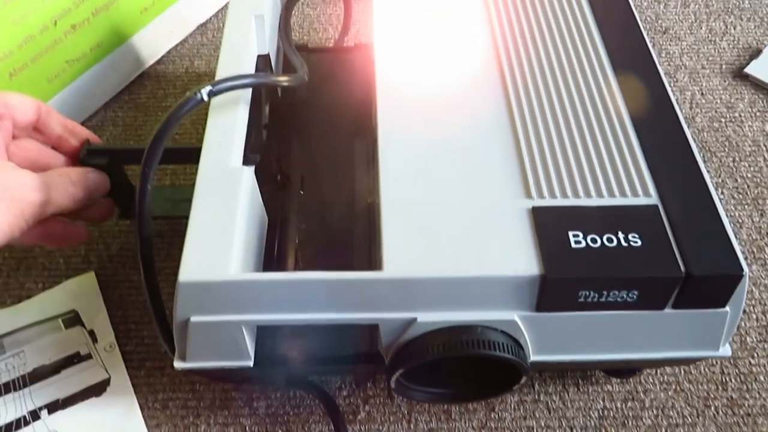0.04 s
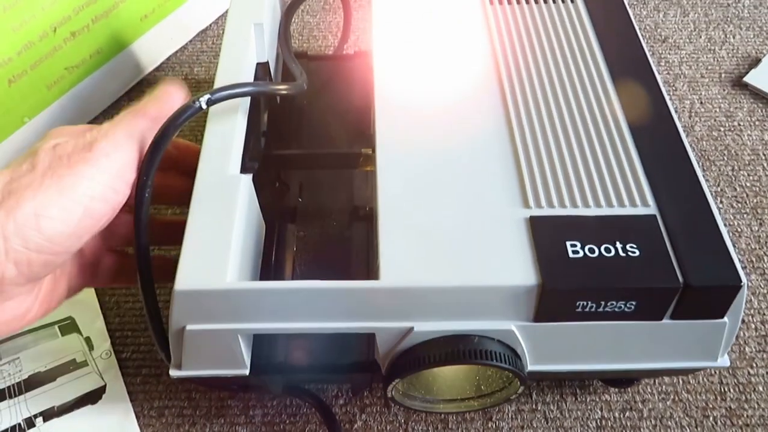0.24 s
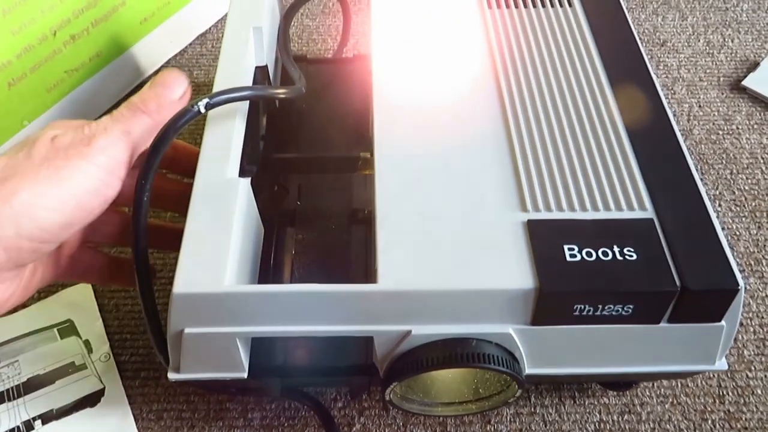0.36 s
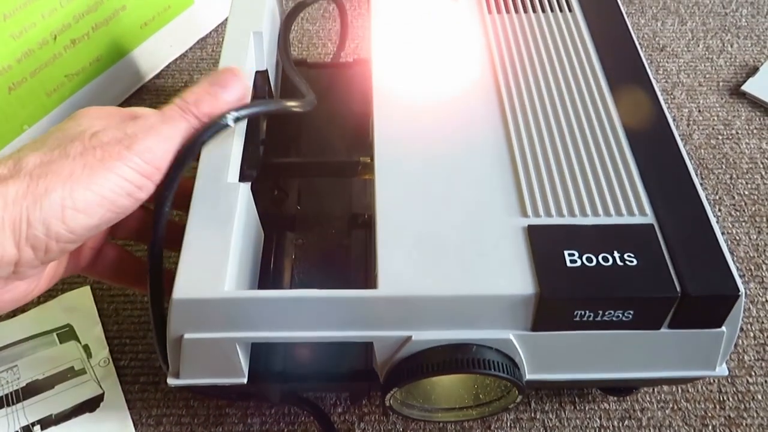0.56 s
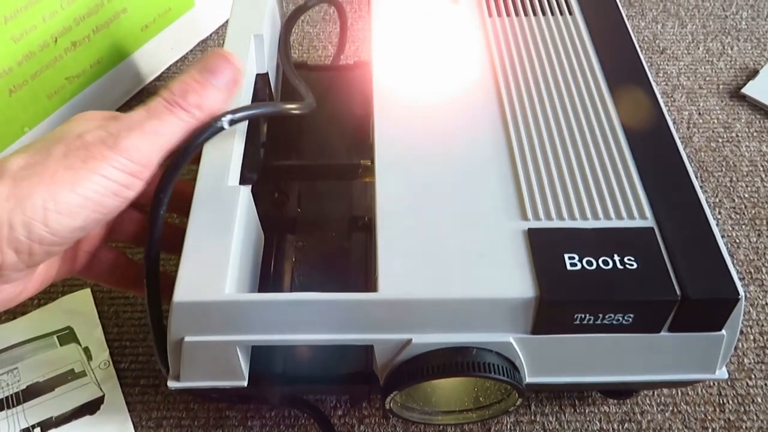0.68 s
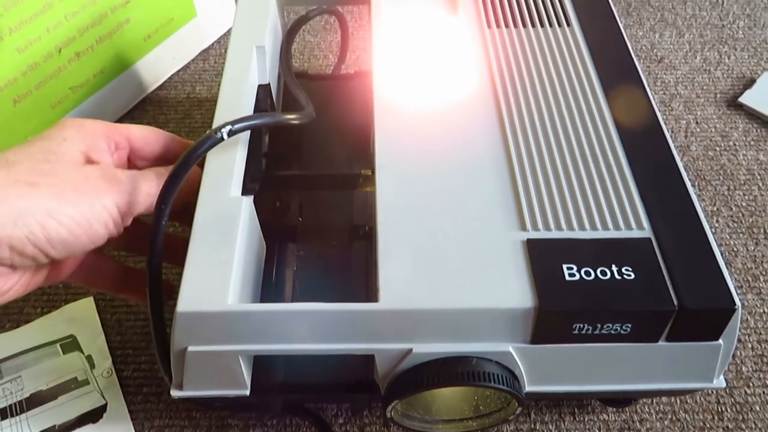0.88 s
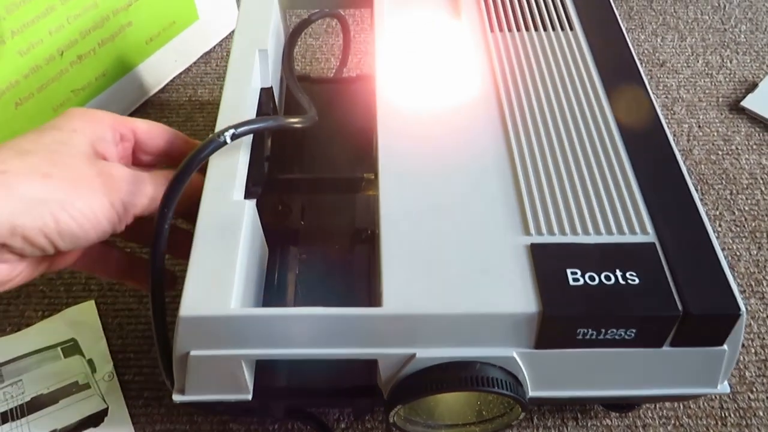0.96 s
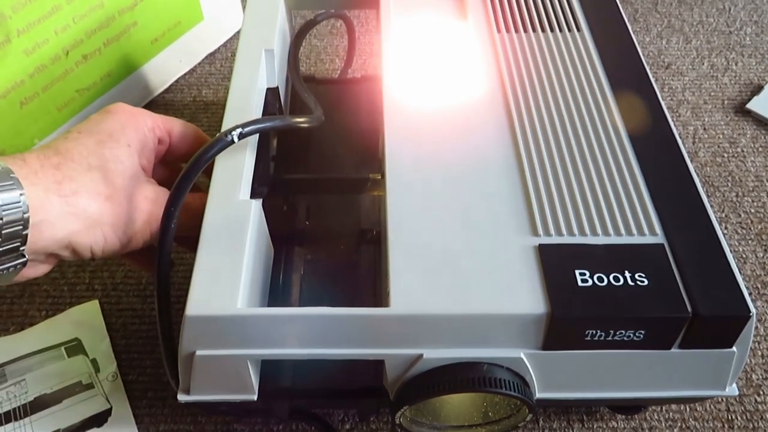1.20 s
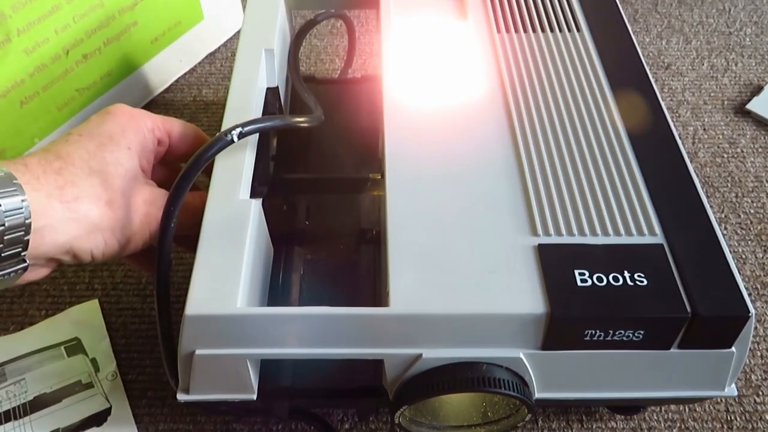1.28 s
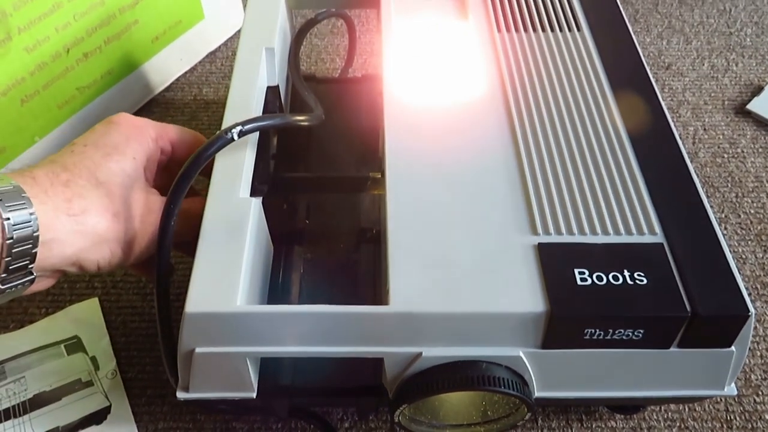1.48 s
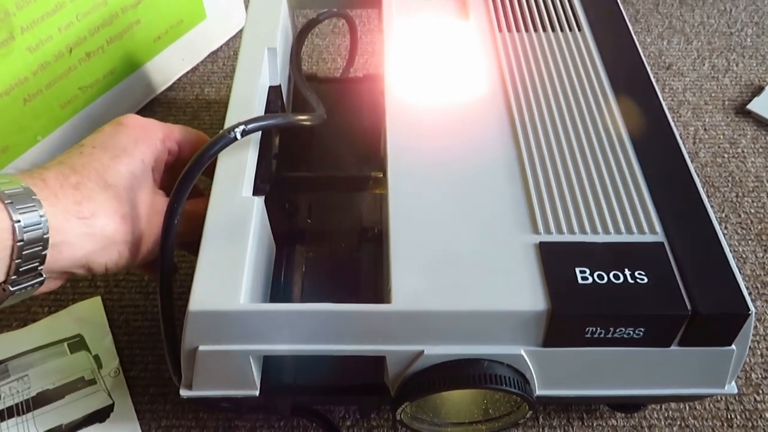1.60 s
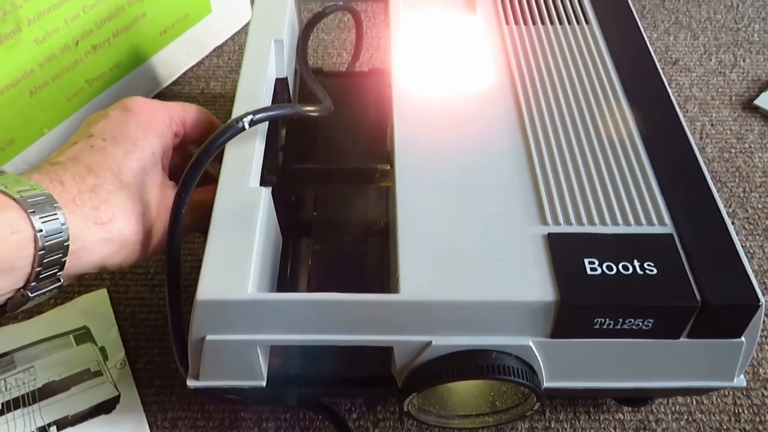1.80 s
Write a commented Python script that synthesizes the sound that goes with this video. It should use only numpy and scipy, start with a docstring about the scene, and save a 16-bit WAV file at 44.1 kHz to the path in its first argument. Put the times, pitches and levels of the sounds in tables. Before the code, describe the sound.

Sharp plastic clack of a slide carrier pushed into a projector, its fan whirring.

```python
"""Slide projector, carrier pushed in.

A fan whirs and a motor hums in a quiet, carpeted room. The plastic slide carrier scrapes and knocks
along its guide, clacks against the stop, rattles and seats; then a hand brushes and bumps the case.
Gain control ducks at the clack and lets the fan swell slowly back."""
import sys
import numpy as np
from scipy import signal
from scipy.fft import rfft, irfft
from scipy.io import wavfile

SR = 44100
rng = np.random.default_rng(int(sys.argv[2]) if len(sys.argv) > 2 else 0)


def inscribe(sig):
    """Save sig as 16-bit PCM at rate SR to the path in sys.argv[1].

    A 1-D sig is mono; a 2-D sig holds one channel per row.
    Samples are clipped to [-1, 1] before scaling.
    """
    pcm = np.round(np.clip(np.atleast_2d(sig).T, -1, 1) * 32767)
    wavfile.write(sys.argv[1], SR, pcm.astype(np.int16))


N = 81585
T, HZ = np.arange(N) / SR, np.fft.rfftfreq(N, 1 / SR)


def amp(db):
    return 10 ** (np.asarray(db) / 20)


def unit_rms(x):
    return x / np.sqrt(np.mean(x ** 2) + 1e-20)


def decay(t60_s):
    return np.exp(-np.log(1000) * T / t60_s)


def attack(rise_s):
    return np.minimum(T / rise_s, 1)


def curve(points, hz=HZ):
    """Table interpolated over log frequency."""
    f, value = np.transpose(points)
    return np.interp(np.log(hz + 1), np.log(f + 1), value)


def colour(x, gain_db):
    return irfft(rfft(x) * amp(gain_db), N)


def drift(rate_hz):
    """Random wander, rms 1."""
    return unit_rms(irfft(rfft(rng.standard_normal(N)) * np.exp(-(HZ / rate_hz) ** 2), N))


def stereo_noise(spectrum_db, width):
    """Coloured mid/side noise, rms 1."""
    mid, side = colour(rng.standard_normal((2, N)), spectrum_db)
    side = colour(side, curve(width))
    return unit_rms(np.array([mid + side, mid - side]))


def band_decay(x, t60_table):
    """Each of eight bands dies at its own rate."""
    centres_hz = np.geomspace(150, 15000, 8)
    spectrum, out = rfft(x), np.zeros_like(x)
    for hz, weights in zip(centres_hz, np.eye(len(centres_hz))):
        band = irfft(spectrum * curve(list(zip(centres_hz, weights))), N)
        out += band * decay(curve(t60_table, hz))
    return out


def ring(modes, rise_s=0.0021):
    """Damped modes with a short build-up."""
    partials = sum(amp(db) * decay(t60_s) * np.sin(2 * np.pi * hz * T) for hz, db, t60_s in modes)
    return partials * (1 - np.exp(-T / rise_s))


def add(mix, start_s, sound):
    part = mix[:, max(round(start_s * SR), 0):]
    part += sound[:, :part.shape[1]]


# Airflow spectrum: f/Hz, level/dB
AIR_SPECTRUM = [(18, -58), (40, -3.5), (65, -14), (86, -5), (115, -11.5), (250, -4.5), (360, -2), (480, -5),
                (780, -3.5), (1080, -7), (1290, -17), (1970, -15), (2450, -12.5), (3200, -26),
                (4800, -26.5), (5500, -33.5), (9700, -40), (15500, -55)]
# Duct resonances: f/Hz, width/Hz, lift/dB
DUCT_RESONANCES = [(328, 50, 3), (1653, 540, 8.5), (2208, 88, 10), (3130, 29, 11.5), (3710, 380, 7),
                   (4560, 53, 5.5), (6130, 240, 8.5), (8000, 250, 2.5)]
# Motor hum and blade tones: f/Hz, level/dB
FAN_TONES = [(99.5, -54.5), (352, -49), (400, -48.5), (711, -55.5), (795, -54), (1121, -55), (1680, -56)]
# Stereo width of fan and hand: f/Hz, side minus mid/dB
CASE_WIDTH = [(60, -20), (180, -10), (500, -19.5), (1650, -18.5), (5000, -10), (15000, -11)]


def fan():
    """Air flutters through resonant ducts; motor and blade tones waver together."""
    ducts_db = sum(db / (1 + (2 * (HZ - hz) / width_hz) ** 2) for hz, width_hz, db in DUCT_RESONANCES)
    air = stereo_noise(curve(AIR_SPECTRUM) + ducts_db, CASE_WIDTH)
    air *= amp(-37 + 0.52 * drift(rate_hz=75))
    speed = 1 + 2.346 / 400 * drift(rate_hz=5.59)  # 2.346 Hz rms at 400 Hz
    rotor_time_s = np.cumsum(speed) / SR
    tones = np.zeros(N)
    for hz, db in FAN_TONES:
        peak = np.sqrt(2) * amp(db + 2.9 * drift(rate_hz=5.7))
        tones += peak * np.sin(2 * np.pi * (hz * rotor_time_s + rng.random()))
    return air + tones


# Skin rubs: t/s, length/s, level/dB
HAND_RUBS = [(1.08, 0.24, -38.5), (1.669, 0.29, -45.5)]
# Soft bumps: t/s, level/dB
HAND_BUMPS = [(1.336, -28.5), (1.70, -41), (1.808, -38)]
# Rub and bump spectra: f/Hz, level/dB
RUB_SPECTRUM = [(100, -28), (400, 7.5), (1000, 2.5), (2300, 1.5), (3200, -11), (5000, -23), (12000, -40)]
BUMP_SPECTRUM = [(20, -20), (45, 0), (90, -36), (230, 12), (400, -8), (900, -52), (4000, -58)]


def hand():
    """A shifting hand brushes the case and bumps it softly."""
    out = np.zeros((2, N))
    for start_s, length_s, db in HAND_RUBS:
        arch = np.sqrt(abs(np.sin(np.pi * np.minimum(T / length_s, 1))))
        add(out, start_s, amp(db) * stereo_noise(curve(RUB_SPECTRUM), CASE_WIDTH) * arch)
    for start_s, db in HAND_BUMPS:
        envelope = attack(rise_s=0.0053) * decay(t60_s=0.14)
        add(out, start_s, amp(db) * stereo_noise(curve(BUMP_SPECTRUM), CASE_WIDTH) * envelope)
    return out


# Plastic decay: f/Hz, t60/s
PLASTIC_T60 = [(200, 0.094), (800, 0.16), (1800, 0.057), (5000, 0.067), (14000, .042)]
# Carrier stereo width: f/Hz, side minus mid/dB
CARRIER_WIDTH = [(60, -13.5), (450, -54), (1000, -22.5), (2200, -13.5), (5000, -7.5), (12000, -2.5)]


def plastic_crack(spectrum_db):
    """Dense modes of struck plastic, as fast-dying noise."""
    return band_decay(stereo_noise(spectrum_db, CARRIER_WIDTH), PLASTIC_T60) * attack(rise_s=0.002)


# Guide friction: t/s, level/dB
SCRAPE_ENVELOPE = [(0, -61), (0.13, -50), (0.18, -40), (0.219, -33.5), (0.26, -33), (0.307, -30),
                   (0.33, -62)]
# Spectrum of slips and knocks in the guide: f/Hz, level/dB
GUIDE_SPECTRUM = [(60, -24), (200, -35), (350, -3.5), (600, -1.5), (1050, -1), (1380, -11), (1650, -2),
                  (2450, -3.5), (3200, -19), (4400, -20), (5200, -27), (7500, -27.5), (12500, -40),
                  (15500, -63.5)]


def scrape(slips_per_s=2000):
    """Tiny plastic-on-plastic slips ring in the carrier, louder as the push firms."""
    slips = (rng.random(N) < slips_per_s / SR) * rng.standard_normal(N)
    slips *= amp(3 * np.minimum(rng.exponential(1, N), 2))  # 0 to 6 dB extra
    body = plastic_crack(curve(GUIDE_SPECTRUM))
    friction = unit_rms(signal.fftconvolve(slips[None], body, axes=1)[:, :N])
    times_s, db = np.transpose(SCRAPE_ENVELOPE)
    return friction * amp(np.interp(T, times_s, db)) * (T < times_s[-1])


# Housing modes: f/Hz, relative level/dB, t60/s
HOUSING_MODES = [(84, -18.5, 0.35), (234.3, -19.5, 0.28), (344, -8, 0.24), (364.4, -0.5, 0.32),
                 (403.6, -6.5, 0.31), (523, -1.5, 0.19), (595, -2, 0.15), (707, -2, 0.22), (994, -5, 0.14),
                 (1040, -18, 0.11), (1509, 4.5, 0.2), (1636, -5, 0.08), (1710, -6, 0.11), (1805, 5, 0.094),
                 (1984, 2, 0.11), (2370, -4.5, 0.043), (2550, 2, 0.074)]
# Room decay: f/Hz, t60/s
ROOM_T60 = [(200, 0.9), (1500, .26), (5000, 0.23), (14000, .17)]


def impact(spectrum, tilt_db_per_oct, housing_db, corner_hz=1850, room_db=-18):
    """One hit: plastic crack, faint room tail, ringing housing."""
    spectrum_db = curve(spectrum) + tilt_db_per_oct * np.log2(1 + (HZ / corner_hz) ** 2) / 2
    crack = plastic_crack(spectrum_db)
    tail = band_decay(stereo_noise(spectrum_db, CARRIER_WIDTH), ROOM_T60) * attack(rise_s=0.0052)
    return crack + amp(room_db) * tail + amp(housing_db) * ring(HOUSING_MODES) / 2


# Knocks: t/s, level/dB, treble tilt/(dB/oct), housing ring/dB
GUIDE_KNOCKS = [(0.2035, -36, 10, -8), (0.2115, -29, -8, -12), (0.2345, -26, 1, -11), (0.2813, -30, 2, -12),
                (0.291, -27, -3, -12), (0.2266, -17, .5, -15), (0.3068, -21, -6, -16)]


def knocks():
    """The moving carrier knocks against its guide."""
    out = np.zeros((2, N))
    for start_s, db, tilt, housing_db in GUIDE_KNOCKS:
        add(out, start_s, amp(db) * impact(GUIDE_SPECTRUM, tilt, housing_db))
    return out


# Seating thud: f/Hz, relative level/dB, t60/s
THUD_MODE = [(351, 2.8, 0.067)]


def seat(start_s=0.3465, level_db=-4, softness_hz=536):
    """The carrier seats softly and rocks the case: a thud plus mainly low housing modes."""
    dulled_modes = [(hz, db - 2.5 - 20 * np.log10(1 + (hz / softness_hz) ** 2 / 2), t60_s)
                    for hz, db, t60_s in HOUSING_MODES]
    out = np.zeros((2, N))
    add(out, start_s, amp(level_db) * ring(THUD_MODE + dulled_modes)[None])
    return out


# Blow and rebounds: t/s, level/dB, treble tilt/(dB/oct), housing ring/dB, frame ring/dB
STOP_BLOWS = [(0.3116, -0.5, 4, -14, -4.5), (0.3182, 0, 1, -15, 1.5), (0.3283, -6, 1, -22, 15.5),
              (0.338, 1, -0.5, -12.5, 7), (0.394, -19, -4.5, -14, -1)]
# Blow spectrum: f/Hz, level/dB
STOP_SPECTRUM = [(60, -40), (200, -27), (350, -13.5), (600, -8), (850, -9.5), (1020, -3), (1260, -6.5),
                 (1620, -2), (1950, -1.5), (2150, -8.5), (2400, -6.5), (2850, -7), (3400, -18.5),
                 (4400, -14.5), (5300, -26), (6350, -21.5), (7100, -30.5), (7900, -29), (11000, -36.5),
                 (15500, -52)]
# Carrier frame modes: f/Hz, relative level/dB, t60/s
FRAME_MODES = [(570, -10, .05), (1000, -13, .045), (1580, 0, .03), (1720, -1, .026), (2350, -7, .03),
               (4400, -20, .025)]


def clack():
    """The carrier strikes the stop and rebounds; its frame rings briefly."""
    frame = ring(FRAME_MODES, rise_s=0.0024)
    out = np.zeros((2, N))
    for start_s, db, tilt, housing_db, frame_db in STOP_BLOWS:
        blow = impact(STOP_SPECTRUM, tilt, housing_db) + amp(frame_db) * frame
        add(out, start_s, amp(db) * blow)
    return out


def scene(right_lag_s=14e-6):
    """Fan and hand ahead, carrier slightly left."""
    left, right = scrape() + knocks() + clack() + seat()
    right = irfft(rfft(right) * np.exp(-2j * np.pi * HZ * right_lag_s), N)
    return fan() + hand() + np.array([left * amp(0.53), right * amp(0.27)])


def smooth(x, tau_s):
    pole = np.exp(-1 / (tau_s * SR))
    return signal.lfilter([1 - pole], [1, -pole], x)


def auto_gain(x, limit_db=-10.5, hold_s=0.18, recover_db_per_s=9.5, look_ahead_s=0.002):
    """Gain that clamps fast above the limit, holds, then recovers slowly."""
    power = smooth((x ** 2).mean(0), tau_s=0.003)
    over_db = np.maximum(10 * np.log10(power + 1e-12) - limit_db, 0)
    recovery_db = T * recover_db_per_s
    released_db = np.maximum.accumulate(over_db + recovery_db) - recovery_db
    duck_db = np.minimum(np.maximum.accumulate(over_db), released_db + hold_s * recover_db_per_s)
    return amp(-np.interp(T + look_ahead_s, T, smooth(duck_db, tau_s=0.0012)))


def record(dry, low_cut_hz=36, ceiling=0.85, high_cut_hz=15700):
    """Rumble filter, gain control, soft clip, band limit."""
    highpass = signal.butter(4, low_cut_hz, "high", fs=SR, output="sos")
    ducked = signal.sosfilt(highpass, dry) * auto_gain(dry)
    clipped = ducked / (1 + (ducked / ceiling) ** 4) ** 0.25
    lowpass = signal.firwin(511, high_cut_hz, window=("kaiser", 9), fs=SR)
    return signal.oaconvolve(clipped, lowpass[None], "same")


dry = scene()
out = record(dry)
inscribe(out)
```